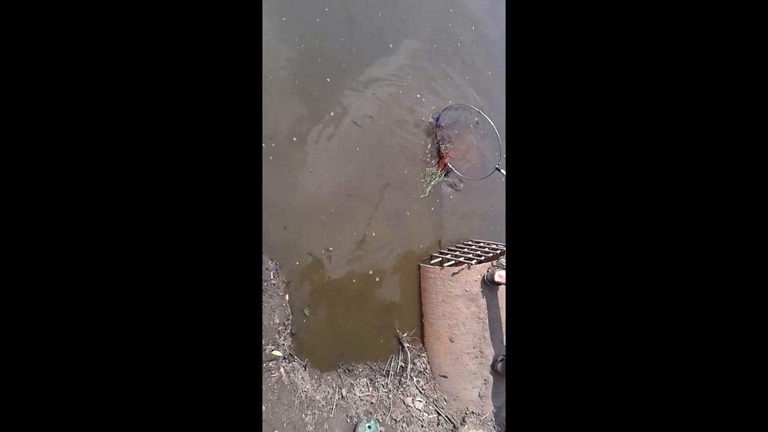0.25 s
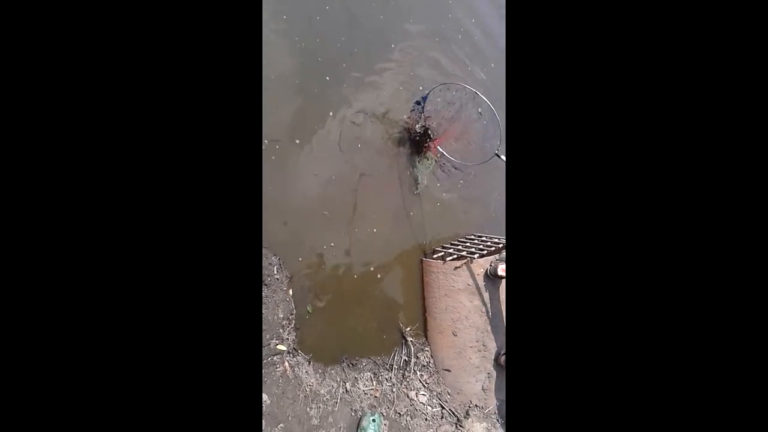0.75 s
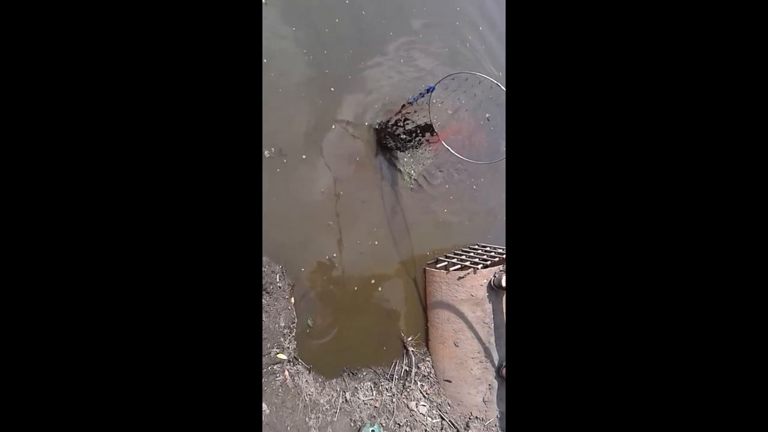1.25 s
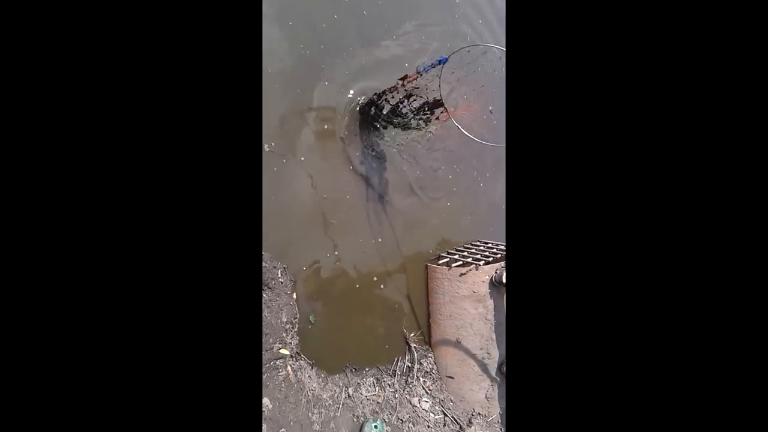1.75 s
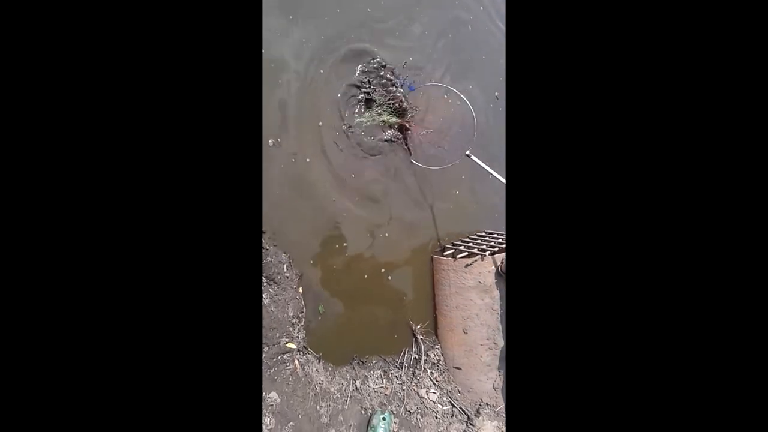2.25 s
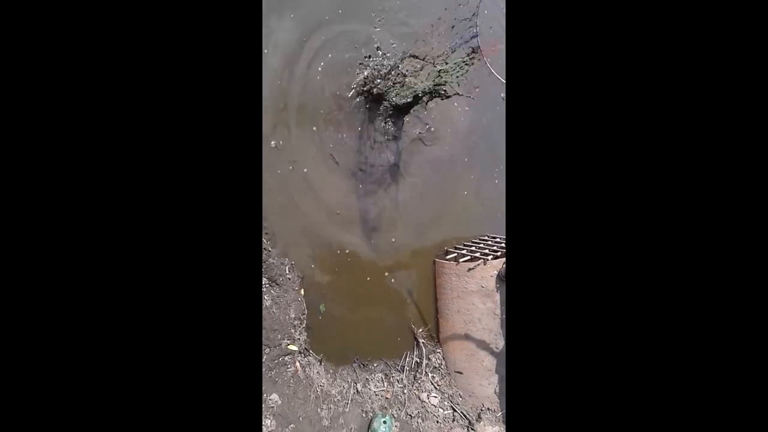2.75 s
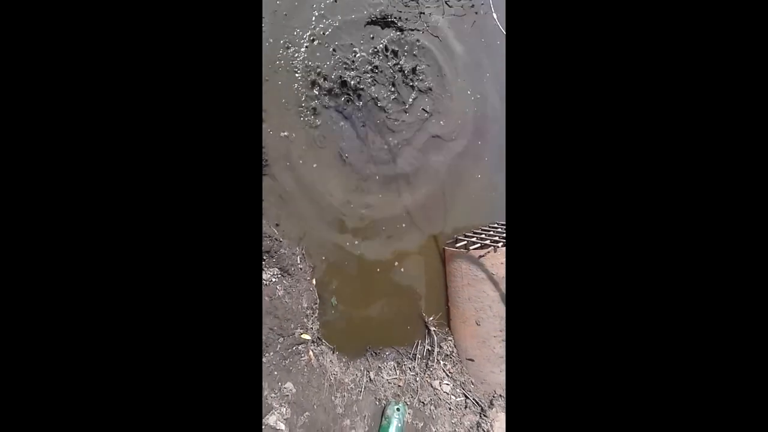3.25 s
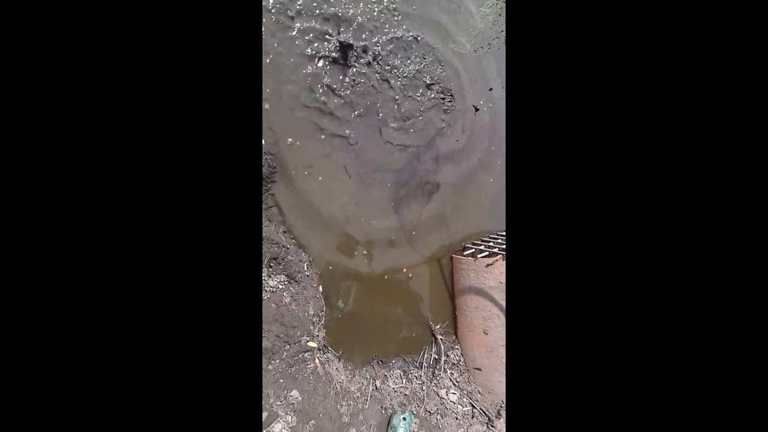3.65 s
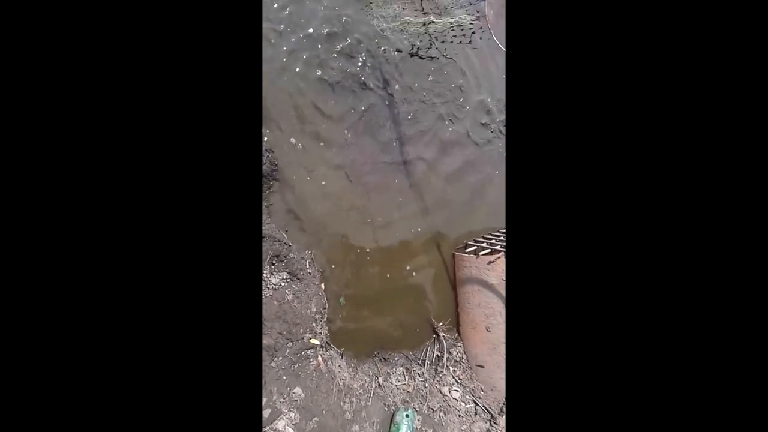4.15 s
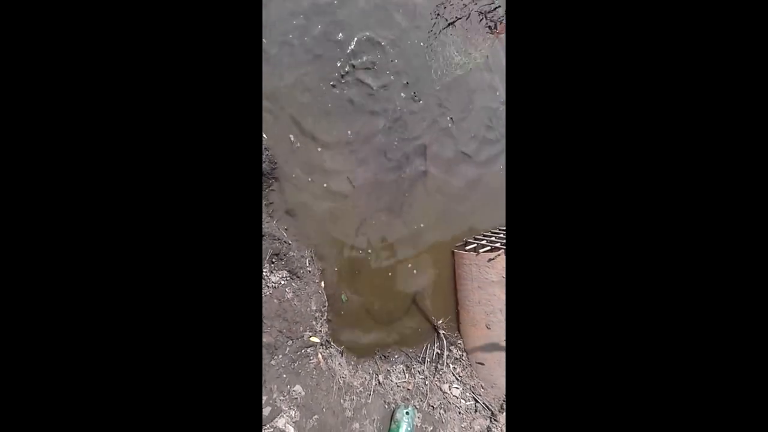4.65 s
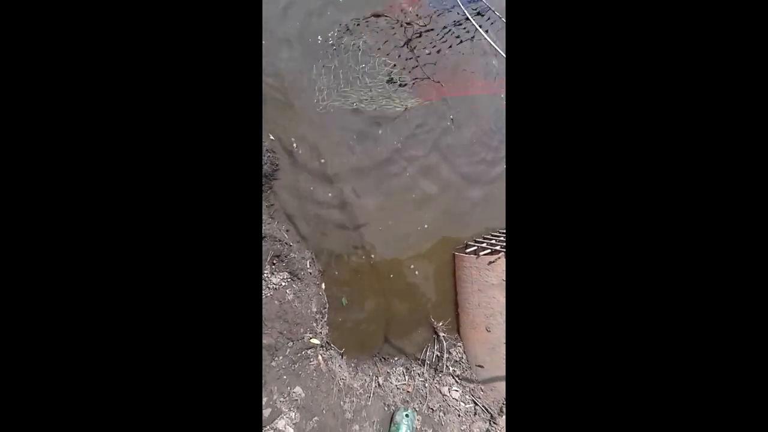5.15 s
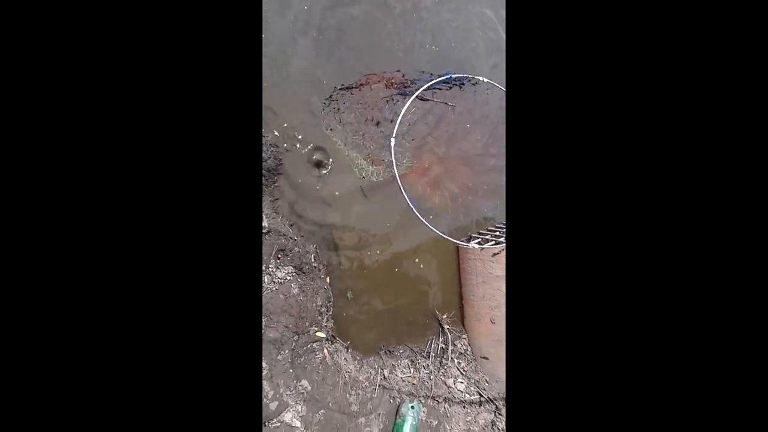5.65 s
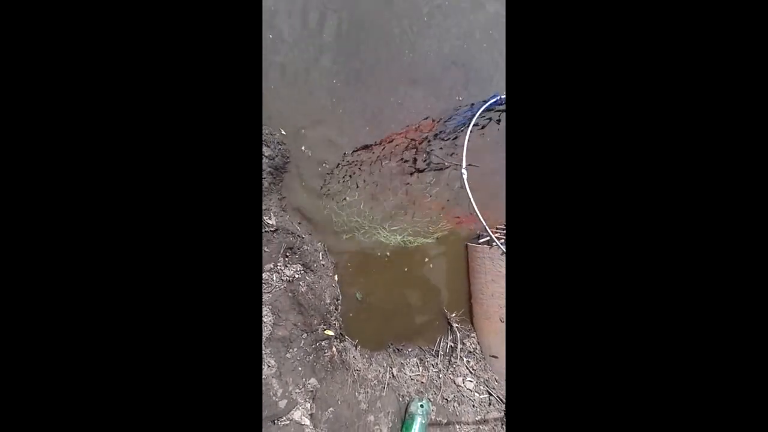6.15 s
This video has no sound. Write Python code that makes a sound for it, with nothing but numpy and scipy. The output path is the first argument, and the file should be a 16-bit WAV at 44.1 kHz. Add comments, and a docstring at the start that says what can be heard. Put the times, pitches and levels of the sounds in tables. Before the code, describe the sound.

Outdoors at a quiet pond, a few small drips lead into about two seconds of splashing and gurgling as a net is shaken in the water. It comes out with a short rising slurp and drips away. A few short, gritty scrapes follow on the bank. A soft breeze brushes the microphone in the later part, over a low hush and a very faint thin whine.

```python
"""A shallow pond, in a quiet hush with a faint whine; a light breeze puffs on the microphone.
A landing net is dunked and shaken: drops slap, trapped bubbles ring, and each gush through the mesh
sheds spray and churns up air. Air pockets gulp, and a hollow slurps shut as the net comes out.
The water sounds carry a short, weak echo. Then something scuffs on the gritty bank."""
import sys
import numpy as np
from scipy import signal
from scipy.fft import rfft, irfft, next_fast_len
from scipy.io import wavfile
from scipy.ndimage import map_coordinates

SR = 44100
rng = np.random.default_rng(int(sys.argv[2]) if len(sys.argv) > 2 else 0)


def transcribe(u):
    """Save the signal u as a 16-bit wav file named by the first command-line argument.

    u: samples, shape (n,) or (channels, n), limited to [-1, 1]; the rate is SR.
    q: integer samples, one column per channel.
    """
    v = np.clip(np.atleast_2d(u).T, -1, 1)
    q = np.round(v * 32767).astype(np.int16)
    wavfile.write(sys.argv[1], SR, q)


N = 282240

# Outdoor hush: (frequency [Hz], relative density [dB])
HUSH_SPECTRUM = [(30, -24.5), (90, -10.5), (170, -2.5), (400, -2), (900, -5), (2000, -9), (3900, -12),
                 (5300, -10.5), (6500, -11.5), (10000, -27)]
# Wind on the microphone: (frequency [Hz], relative density [dB])
WIND_SPECTRUM = [(15, -12), (35, -8), (65, 0), (110, -5.5), (200, -16.5), (500, -24), (1500, -68)]
# Air between puffs, slowly freshening: (time [s], level [dB])
WIND_FLOOR = [(1.5, -90.5), (3.5, -75.5), (6.4, -68)]
# Puffs of breeze: (centre time [s], level [dB], Gaussian sigma [s])
WIND_PUFFS = [(2.184, -58, 0.015), (2.625, -68, 0.05), (3.135, -65.5, .06), (3.324, -63, 0.052),
              (3.903, -56, 0.027), (4.2, -62, 0.041), (4.605, -66, 0.019), (5.11, -61.5, 0.022),
              (5.356, -59.5, 0.034), (5.985, -57, 0.11), (6.356, -61, 0.086)]
# Slaps and drops from the net: (time [s], level over 10 ms [dB], centre [Hz], width [octaves])
DROP_HITS = [(0.14, -57.5, 5860, 0.34), (0.5351, -56.5, 820, 0.97), (0.586, -58, 3900, .3),
             (0.722, -58.5, 4450, 0.16), (0.9325, -48, 3330, 0.65), (1.0498, -44, 4470, 1.8),
             (1.086, -54, 5030, 0.43), (1.177, -26, 3670, 1.5), (1.2314, -40.5, 3110, 0.9),
             (1.2444, -38, 4600, 1), (1.2548, -41, 3080, 1.6), (1.294, -39, 3200, 1.3),
             (1.3299, -39.5, 1490, 3.6), (1.4154, -39.5, 3700, 1.2), (1.426, -39.5, 2360, 0.31),
             (1.438, -37.5, 3460, 0.23), (1.5702, -45, 4330, 0.22), (1.5828, -43, 3320, 2.5),
             (1.8427, -43.5, 3000, 1.5), (1.896, -44.5, 2870, .18), (2.067, -37, 2260, 0.54),
             (2.0981, -38, 4800, 0.48), (2.1044, -33.5, 5500, 0.12), (2.114, -35.5, 3900, .17),
             (2.129, -38.5, 2320, .95), (2.2083, -37.5, 2150, 0.33), (2.224, -32.5, 4340, 0.83),
             (2.284, -47, 5110, 0.47), (2.298, -39, 5000, 0.17), (2.3177, -45, 4760, .2),
             (2.3623, -36.5, 5440, 0.58), (2.41, -45.5, 4700, 0.49), (2.5587, -37, 3100, 1.7),
             (2.571, -33, 4270, 0.77), (2.6065, -37.5, 5640, 0.13), (2.8003, -43.5, 2700, 0.59),
             (2.8883, -37.5, 2110, 0.98), (2.9428, -46.5, 2280, 1.0), (3.001, -43.5, 3950, 0.48),
             (3.0311, -38.5, 5970, 0.27), (3.1614, -42, 3330, 0.32), (3.396, -53, 5000, 0.57),
             (3.441, -44.5, 4870, 0.075), (3.478, -51, 4800, 0.8), (3.627, -57.5, 4960, .2),
             (3.9812, -49, 4100, .7), (4.7354, -46.5, 4270, 0.4), (5.0, -53, 2500, 1.4),
             (6.263, -56, 5100, 0.19)]
# Trapped bubbles: (time [s], level [dB], start pitch [Hz])
BUBBLE_RINGS = [(0.534, -44.5, 499), (0.534, -45, 1380), (1.177, -32, 540), (1.177, -22.5, 3390),
                (1.296, -36.5, 1750), (1.297, -40, 545), (1.327, -31.5, 1060), (1.341, -28.5, 1270),
                (1.412, -31.5, 1113), (1.414, -20.5, 5100), (1.435, -35.5, 1282), (1.497, -31.5, 2970),
                (1.638, -25.5, 5300), (1.701, -33, 4360), (1.877, -37.5, 1840), (1.954, -37.5, 1285),
                (2.027, -28, 5860), (2.157, -34, 1900), (2.182, -27, 5380), (2.207, -37.5, 1730),
                (2.221, -35, 1323), (2.364, -21.5, 5130), (2.487, -35, 2050), (2.523, -20.5, 5970),
                (2.531, -39, 1596), (2.556, -33, 1474), (2.644, -23.5, 4400), (2.675, -29, 5640),
                (2.714, -38, 960), (2.729, -37, 1210), (2.887, -36.5, 1226), (2.915, -38.5, 1430),
                (2.941, -38.5, 1910)]
# One gush per shake of the net: (start [s], hold [s], spray level [dB], churn level [dB])
NET_GUSHES = [(1.15, 0.053, -44, -51), (1.273, 0.073, -43, -45.5), (1.412, 0.052, -48.5, -47.5),
              (1.594, 0.05, -49.5, -72), (1.728, 0.25, -50.5, -60), (2.084, .02, -44, -53),
              (2.205, .015, -45, -65), (2.306, 0.013, -50, -70), (2.561, 0.011, -41, -50),
              (2.63, .11, -52.5, -58), (2.88, 0.071, -55, -69)]
# Wash under the spray: (frequency [Hz], relative density [dB])
SPRAY_SPECTRUM = [(880, -32), (1500, -20.5), (1790, -2.5), (2340, -7), (5850, -2.5), (6990, -4.5),
                  (8020, -19), (9430, -12), (10400, -36), (13500, -81), (22000, -120)]
# Wash under the churn: (frequency [Hz], relative density [dB])
CHURN_SPECTRUM = [(200, -51), (450, -34), (900, -4), (1400, 12), (2100, 15), (3500, -21), (7000, -56)]
# Large air pockets: (time [s], level [dB], start pitch [Hz], end pitch [Hz], T60 [s])
POCKET_GULPS = [(1.428, -43, 815, 930, 0.11), (1.483, -40.5, 624, 1140, 0.057),
                (1.523, -43.5, 1090, 956, 0.067), (2.564, -48.5, 598.5, 903, 0.27),
                (4.999, -41, 657, 514, 0.079)]
# Hollow closing under the net: (time [s], pitch [Hz], level [dB])
SLURP_SWEEP = [(2.716, 503, -70), (2.723, 493, -46.5), (2.741, 537, -48), (2.751, 737, -41.5),
               (2.759, 1100, -43), (2.765, 1340, -36.5), (2.77, 1450, -68)]
# Scuffs on the bank: (centre time [s], level [dB], Gaussian sigma [s], body cut [dB])
BANK_SCUFFS = [(4.77, -57.5, 0.035, 1), (4.861, -44.5, 0.018, -1.5), (4.95, -59, 0.029, -3),
               (5.064, -46.5, 0.0042, 11), (5.107, -47.5, .014, 7), (5.1591, -34, 0.0028, -1),
               (5.165, -45.5, 0.0061, -10.5), (5.274, -50.5, 0.0091, 1), (5.331, -55.5, 0.02, -3.5),
               (5.411, -41, .012, -2.5), (5.411, -30.5, 0.0044, 10), (5.442, -43, 0.0029, -2),
               (5.467, -42.5, .012, -1.5), (5.52, -50.5, 0.012, 0.5), (5.569, -50.5, 0.012, 2),
               (5.733, -36, 0.003, 11.5)]
# Scraped grit: (frequency [Hz], relative density [dB])
GRIT_SPECTRUM = [(60, -24), (250, -8.5), (600, 0.5), (1400, 1), (2150, -3.5), (2700, 0.5), (4000, -0.5),
                 (5800, 2.5), (7000, -3.5), (11000, -20.5)]
# Microphone treble roll-off: (frequency [Hz], gain [dB])
MIC_RESPONSE = [(6200, -0.5), (7200, -5), (7900, -21), (9000, -9.5), (9900, -16), (10500, -26.5)]


def amp(db):
    return 10 ** (np.asarray(db) / 20)


def unit(x):
    return x / np.sqrt(np.mean(x ** 2) + 1e-20)


def along(points, hz):
    """Interpolate (frequency, value) points on a log axis."""
    f, v = np.transpose(points)
    return np.interp(np.log(hz + 1), np.log(f + 1), v)


def curves(rows):
    """Per-sample curve for each column after the time."""
    s, *cols = np.transpose(rows)
    return [np.interp(np.arange(N) / SR, s, c) for c in cols]


def wobble(rate_hz):
    """Smooth random curve, rate_hz knots a second."""
    knots = rng.standard_normal(int(N * rate_hz / SR) + 4)
    return map_coordinates(knots, [np.arange(N) * rate_hz / SR])


def filtered(x, response):
    """Zero-phase filter with gain response(hz)."""
    m = next_fast_len(N + SR // 2)
    return irfft(rfft(x, m) * response(np.fft.rfftfreq(m, 1 / SR)), m)[:N]


def noise(spectrum, envelope=1):
    """Enveloped white noise shaped to a spectrum, rms 1."""
    return unit(filtered(rng.standard_normal(N) * envelope, lambda hz: amp(along(spectrum, hz))))


def causal(gain):
    """Minimum-phase impulse response for a gain curve."""
    cepstrum = irfft(np.log(np.maximum(gain, 1e-6)))
    half = len(cepstrum) // 2
    return irfft(np.exp(rfft(cepstrum * np.r_[1, np.full(half - 1, 2), np.zeros(half)])))


def add(track, s, sound):
    start = max(round(s * SR), 0)
    track[start:start + len(sound)] += sound[:N - start]


def hush(level_db=-59.0, drift_db=0.14):
    """Near-steady outdoor noise."""
    return amp(level_db + drift_db * wobble(5.18)) * noise(HUSH_SPECTRUM)


def breeze(gain_db=-1, flutter_db=2.6):
    """Wind rumbles on the microphone: puffs over a rising floor."""
    t = np.arange(N) / SR
    floor_db, = curves(WIND_FLOOR)
    puffs = sum(amp(db) * np.exp(-((t - s) / sigma_s) ** 2 / 2) for s, db, sigma_s in WIND_PUFFS)
    return (amp(floor_db) + puffs) * amp(gain_db + flutter_db * wobble(25)) * noise(WIND_SPECTRUM)


def whine(pitch_hz=4732, level_db=-73, waver_hz=4):
    """Faint, thin, wavering tone."""
    hz = pitch_hz + waver_hz * wobble(60)
    return amp(level_db) * unit(np.sin(2 * np.pi * np.cumsum(hz) / SR))


def bubble_cloud(count, centre_hz, spread, cycles, scatter_db, rise, samples):
    """Small bubbles at random times: damped sines gliding upward, rms 1."""
    when, loud = rng.random((2, count))
    pitch, life = rng.standard_normal((2, count, 1))
    turns = np.clip(centre_hz * np.exp(spread * pitch), 350, 9000) * np.arange(samples) / SR
    age = turns / (cycles * np.exp(0.53 * life))  # 1 at -60 dB
    rings = np.sin(2 * np.pi * turns * (1 + rise * np.minimum(age, 1) / 2)) * amp(-60 * age)
    gains = amp(scatter_db * np.minimum(-np.log(1 - loud), 3.5))
    start = (when * (N - samples)).astype(int)
    index = start[:, None] + np.arange(samples)
    return unit(np.bincount(index.ravel(), (rings * gains[:, None]).ravel(), N))


def drips(tick_db=-76, patter_db=-57, rise_tau_s=0.22, fade_tau_s=0.32):
    """Tiny drips tick off the wet mesh throughout and patter while it is shaken."""
    ticks = bubble_cloud(70, centre_hz=5000, spread=.16, cycles=12, scatter_db=2.4, rise=.2, samples=600)
    patter = bubble_cloud(330, centre_hz=4990, spread=.24, cycles=13, scatter_db=3, rise=.47, samples=600)
    t = np.arange(N) / SR
    early_s, late_s = np.maximum(NET_GUSHES[0][0] - t, 0), np.maximum(t - NET_GUSHES[-1][0], 0)
    shedding = np.exp(-early_s / rise_tau_s - late_s / fade_tau_s)
    return amp(tick_db) * ticks + amp(patter_db) * shedding * patter


def drops(spatter=1.04, skirt_db=-32, entry_db=-3, entry_tau_s=.0016, octave_t60_s=0.021):
    """Each drop hisses on entry, slaps and spatters, coloured by the size of its crater."""
    out, lead = np.zeros(N), SR // 100
    t = (np.arange(2048) - lead) / SR
    hz = np.fft.rfftfreq(len(t), 1 / SR) + 1
    for s, db, centre_hz, width_oct in DROP_HITS:
        t60_s = octave_t60_s * width_oct ** 0.18  # wider craters spatter longer
        entry = amp(entry_db) * np.exp(-np.abs(t) / (entry_tau_s * (.3 + width_oct)))
        decay = amp(-60 * np.abs(t) / t60_s)
        push = rng.standard_normal(len(t)) * np.where(t < 0, entry, decay)
        push *= spatter / np.linalg.norm(push)
        push[lead] += 1  # the slap
        crater = np.exp(-(np.log2(hz / centre_hz) / width_oct) ** 2 / 4)
        colour = (crater + amp(skirt_db)) / np.hypot(1, (470 / hz) ** 5) / np.hypot(1, (hz / 7500) ** 6)
        hit = signal.fftconvolve(push, causal(colour))
        add(out, s - lead / SR, amp(db) * hit * np.sqrt(SR / 100) / np.linalg.norm(hit))
    return out


def bank_echo(x, t60_s=0.075, echo_db=-14):
    """Bank and water scatter a short, weak echo."""
    t = np.arange(SR // 5) / SR
    tail = rng.standard_normal(len(t)) * amp(-60 * t / t60_s) * (t > .003)
    return amp(echo_db) * signal.fftconvolve(x, tail / np.linalg.norm(tail))[:N]


def ring(db, start_hz, end_hz, t60_s, attack_s=0.00068):
    """Trapped air rings, gliding as it decays."""
    t = np.arange(SR // 5) / SR
    hz = start_hz + (end_hz - start_hz) * np.minimum(2 * t / t60_s, 1)
    envelope = amp(db - 60 * t / t60_s) * (1 - np.exp(-t / attack_s))
    return envelope * np.sin(2 * np.pi * np.cumsum(hz) / SR)


def bubbles(gain_db=3, rise=0.069, large_t60_s=0.039, half_t60_hz=2770):
    """Bubbles rise in pitch as they near the surface; large ones ring longest."""
    out = np.zeros(N)
    for s, db, hz in BUBBLE_RINGS:
        t60_s = large_t60_s / (1 + (hz / half_t60_hz) ** 2)
        add(out, s, ring(db + gain_db, hz, hz * (1 + rise), t60_s))
    return out


def gush_flow(attack_tau_s=0.031, release_tau_s=0.058, trickle_db=-16, trickle_tau_s=0.27):
    """Spray and churn envelopes: each gush swells, holds and falls to a trickle as the mesh drains."""
    t = np.arange(N) / SR
    power = np.zeros((2, N))
    for start_s, hold_s, spray_db, churn_db in NET_GUSHES:
        early_s, late_s = np.maximum(start_s - t, 0), np.maximum(t - start_s - hold_s, 0)
        trickle = amp(trickle_db) * np.exp(-late_s / trickle_tau_s)
        fall = np.maximum(np.exp(-late_s / release_tau_s), trickle)
        power += (amp([[spray_db], [churn_db]]) * np.exp(-early_s / attack_tau_s) * fall) ** 2
    return np.sqrt(power)


def gushes(spray_db=-1, churn_db=-3, spray_wash=.6, churn_wash=0.67, tick_gain=0.62):
    """The mesh tears water into spray and churns up larger bubbles; stray ticks and plops stand out."""
    spray_flow, churn_flow = gush_flow()
    fine = bubble_cloud(4200, centre_hz=4780, spread=.341, cycles=68, scatter_db=6, rise=.17, samples=560)
    big = bubble_cloud(1500, centre_hz=1550, spread=.4, cycles=17, scatter_db=3, rise=.2, samples=1100)
    ticks = bubble_cloud(420, centre_hz=4210, spread=.46, cycles=22, scatter_db=3, rise=.25, samples=600)
    plops = bubble_cloud(170, centre_hz=1564, spread=.33, cycles=58, scatter_db=.5, rise=.56,
                         samples=2200)
    spray = fine + tick_gain * ticks + spray_wash * noise(SPRAY_SPECTRUM)
    churn = big + plops + churn_wash * noise(CHURN_SPECTRUM)
    water = amp(spray_db) * spray_flow * spray + amp(churn_db) * churn_flow * churn
    # Small splashes radiate no bass.
    return filtered(water, lambda hz: 1 / np.hypot(1, (400 / (hz + 1)) ** 4))


def gulps(gain_db=3):
    """Large air pockets glide in pitch as they change size."""
    out = np.zeros(N)
    for s, db, start_hz, end_hz, t60_s in POCKET_GULPS:
        add(out, s, ring(db + gain_db, start_hz, end_hz, t60_s))
    return out


def slurp(rough_db=2):
    """The hollow under the rising net shrinks, so its note sweeps up."""
    hz, db = curves(SLURP_SWEEP)
    t = np.arange(N) / SR
    sounding = (t > SLURP_SWEEP[0][0]) & (t < SLURP_SWEEP[-1][0])
    return sounding * amp(db + rough_db * wobble(300)) * np.sin(2 * np.pi * np.cumsum(hz) / SR)


def scuffs(grain_db=4, body_hz=2200):
    """Short scrapes: a rush of tiny grains swells and stops; some carry less body than others."""
    t = np.arange(N) / SR
    grit = noise(GRIT_SPECTRUM, envelope=amp(grain_db * wobble(1500)))
    body = filtered(grit, lambda hz: 1 / (1 + (hz / body_hz) ** 4))
    out = np.zeros(N)
    for s, db, sigma_s, cut_db in BANK_SCUFFS:
        near = np.abs(t - s) < 4 * sigma_s
        swell = amp(db) * np.exp(-((t[near] - s) / sigma_s) ** 2 / 2)
        out[near] += swell * (grit[near] + (amp(-cut_db) - 1) * body[near])
    return out


def scene():
    """Mono mix; only the water feeds the echo."""
    water = gushes() + drops() + drips() + bubbles() + gulps() + slurp()
    return (water + bank_echo(water) + scuffs() + hush() + breeze() + whine())[None]


def record(dry, limit_hz=10500):
    """The microphone dulls the treble and cuts off at its band limit."""
    hz = np.fft.rfftfreq(1024, 1 / SR)
    dulled = signal.fftconvolve(dry[0], causal(amp(along(MIC_RESPONSE, hz))))[:N]
    return filtered(dulled, lambda hz: hz < limit_hz)[None]


dry = scene()
out = record(dry)
transcribe(out)
```